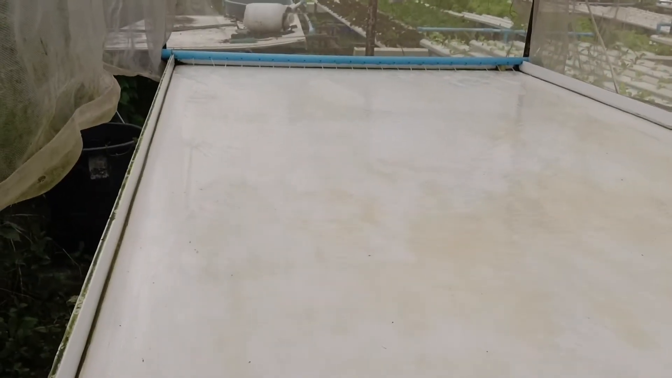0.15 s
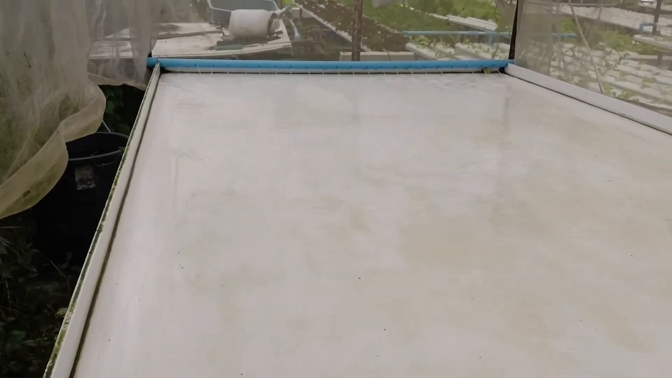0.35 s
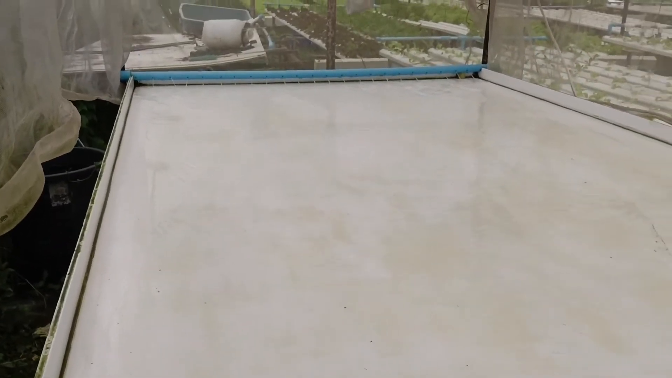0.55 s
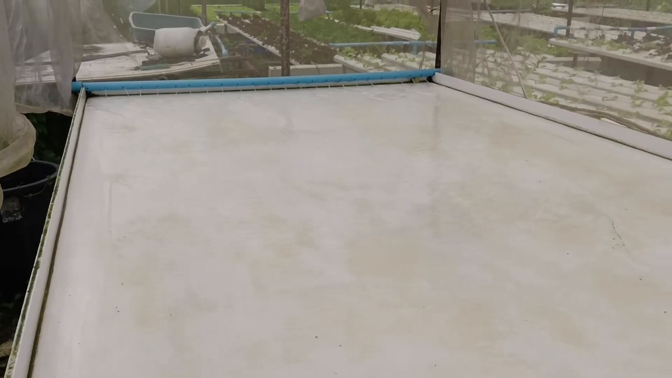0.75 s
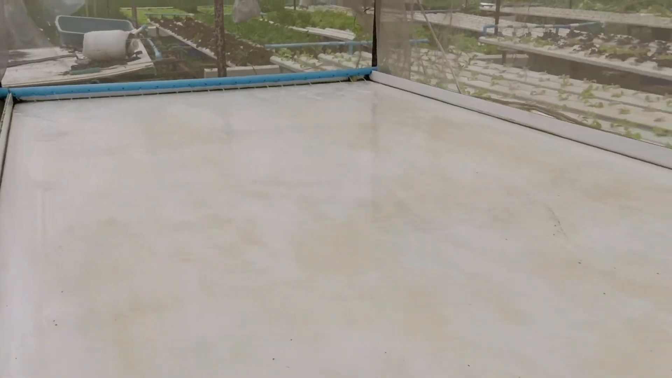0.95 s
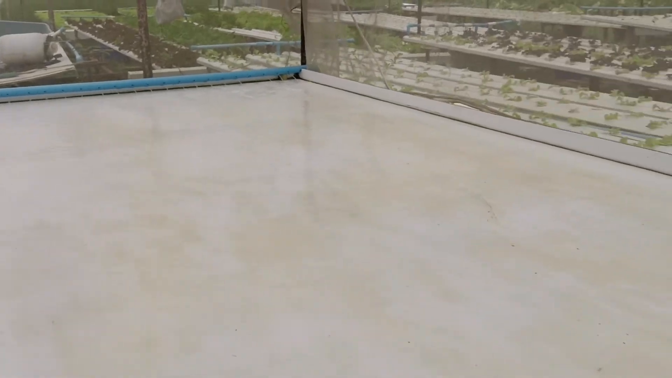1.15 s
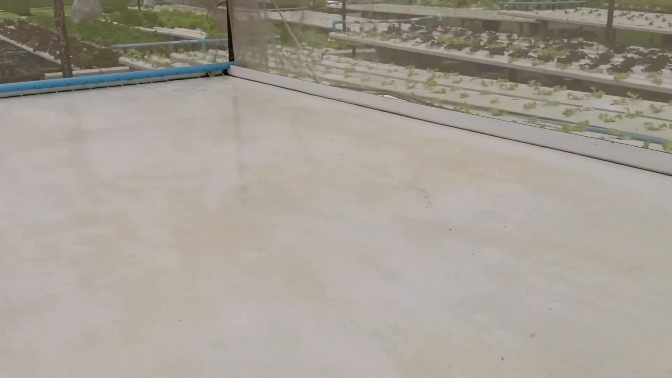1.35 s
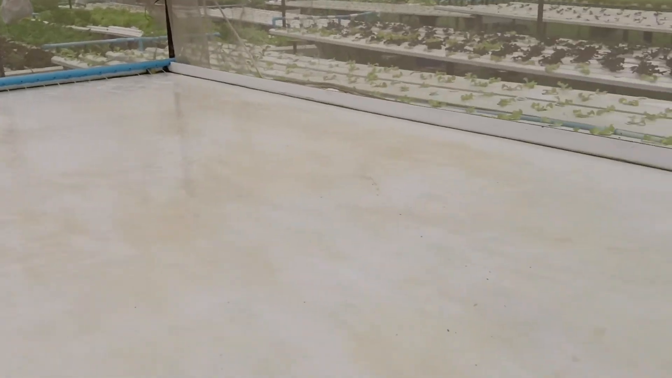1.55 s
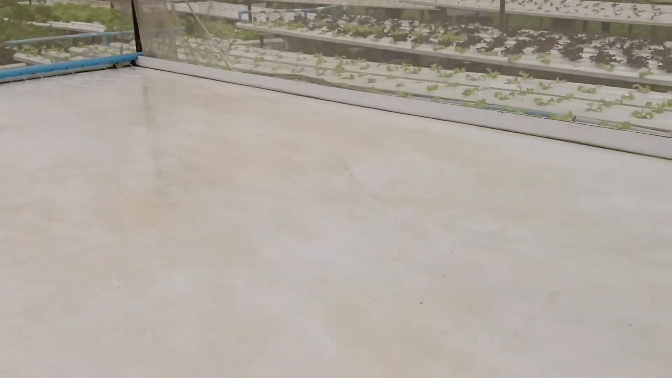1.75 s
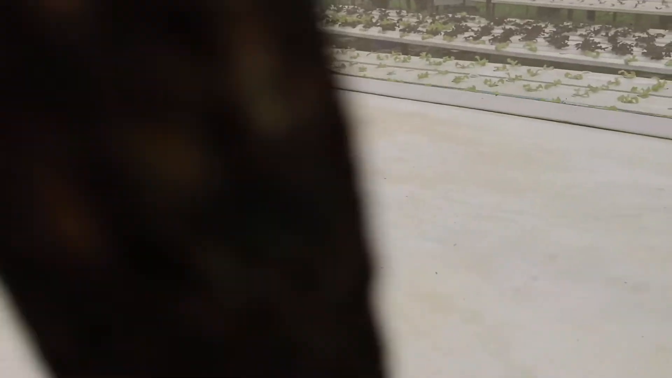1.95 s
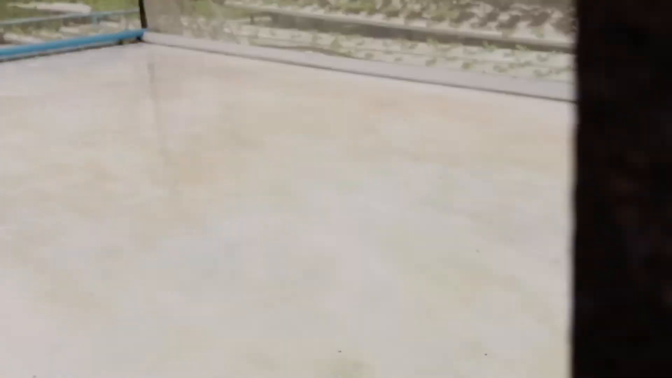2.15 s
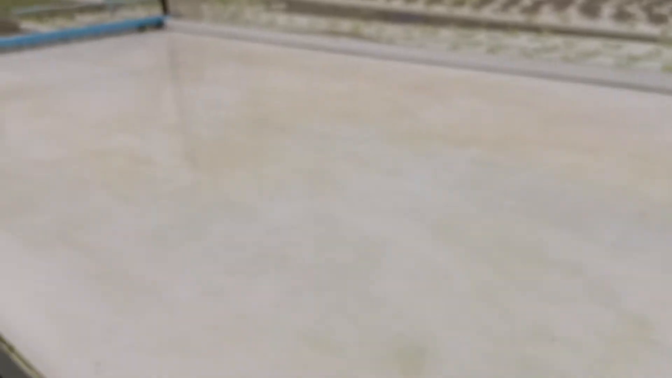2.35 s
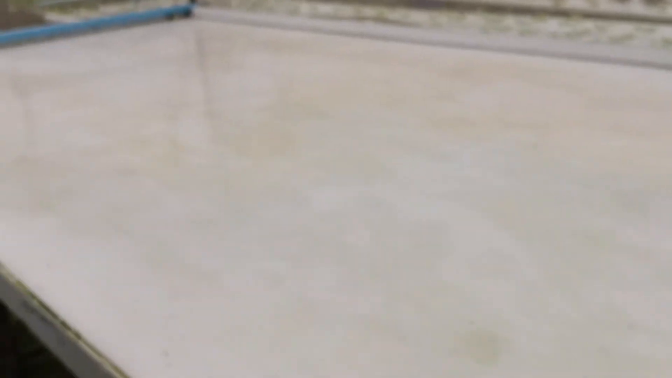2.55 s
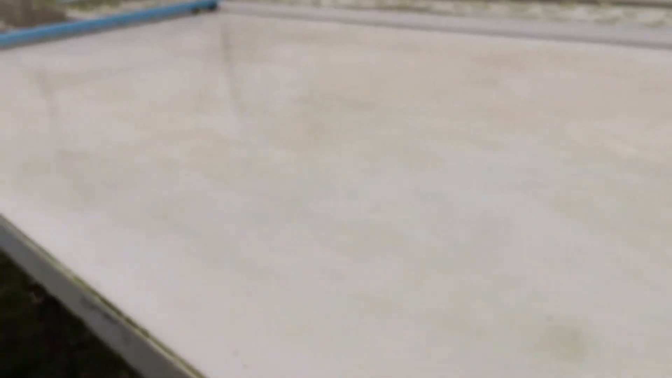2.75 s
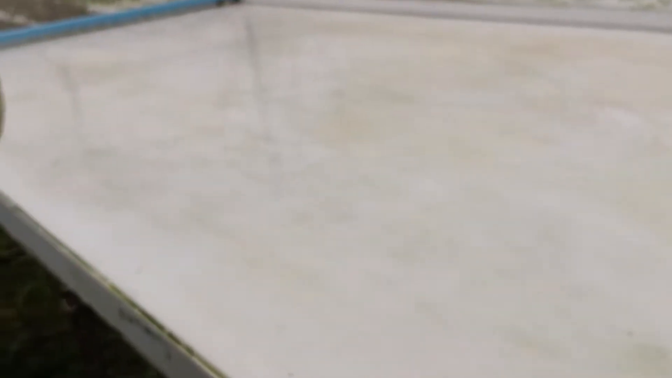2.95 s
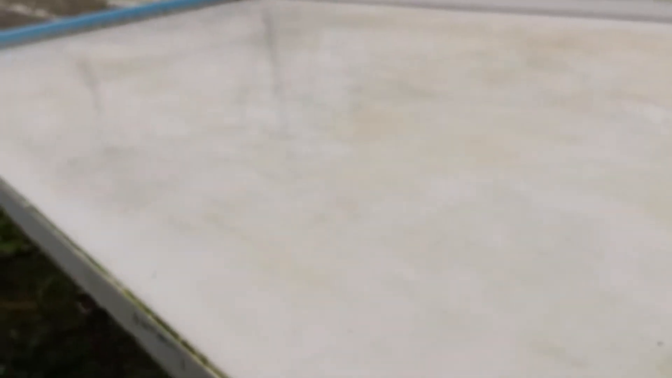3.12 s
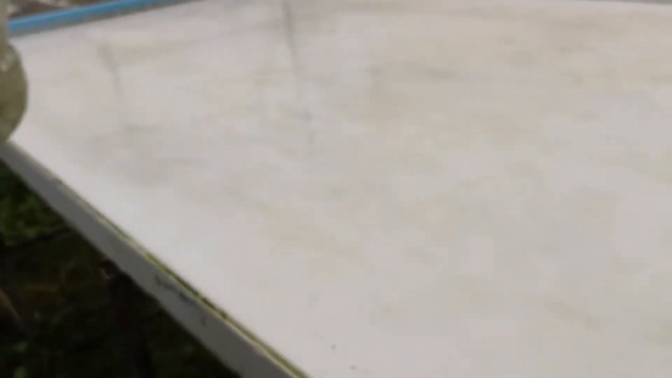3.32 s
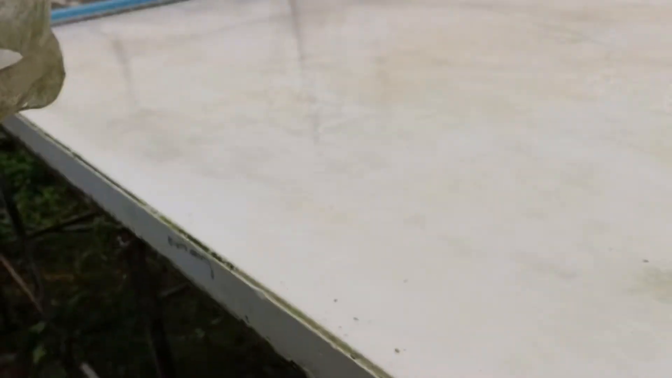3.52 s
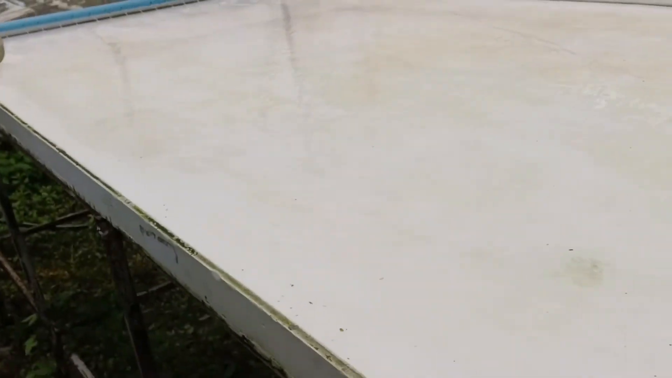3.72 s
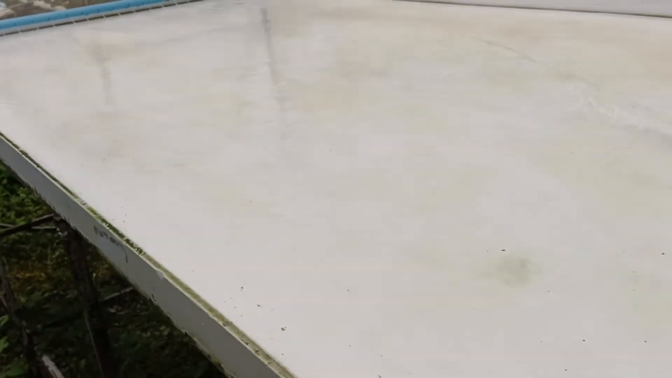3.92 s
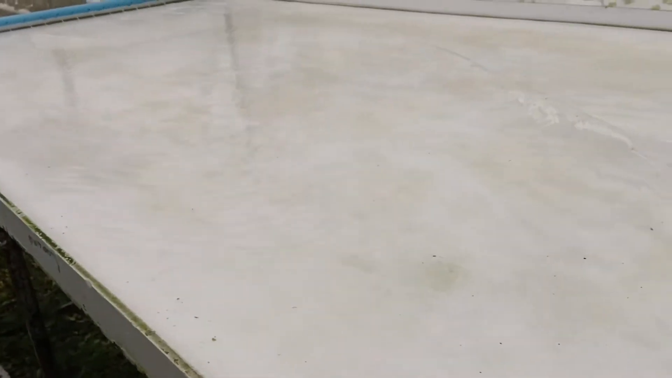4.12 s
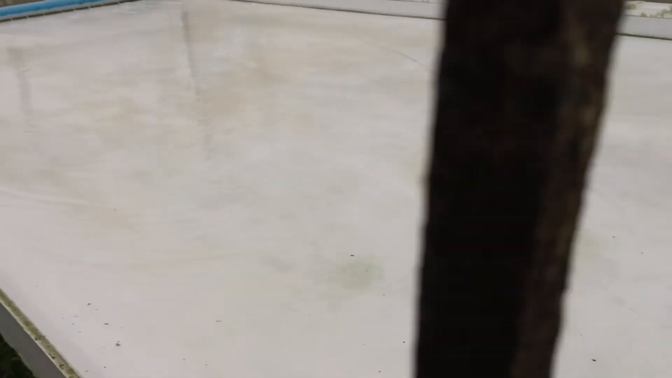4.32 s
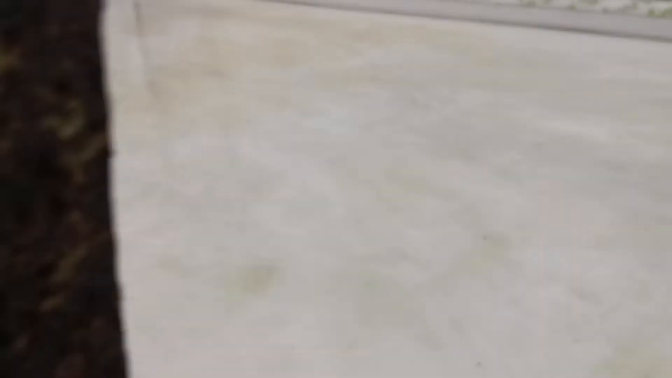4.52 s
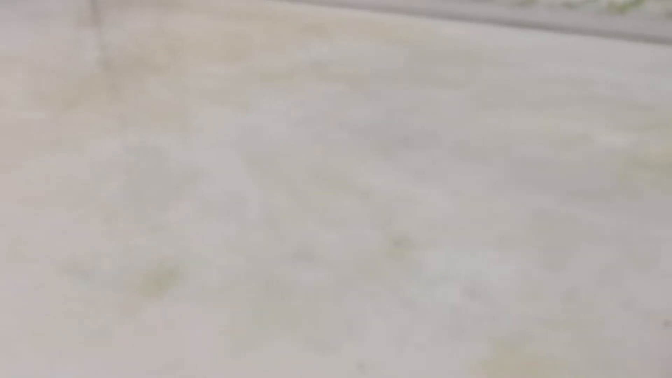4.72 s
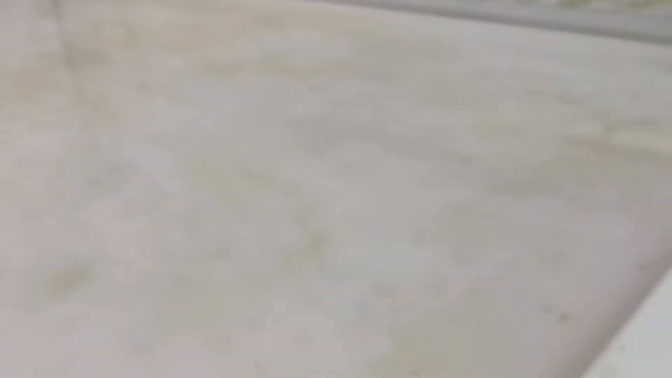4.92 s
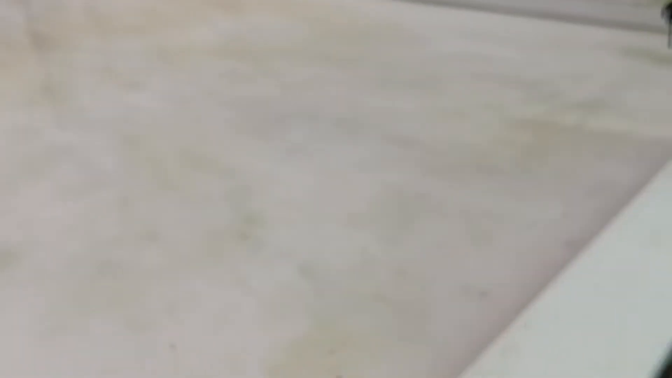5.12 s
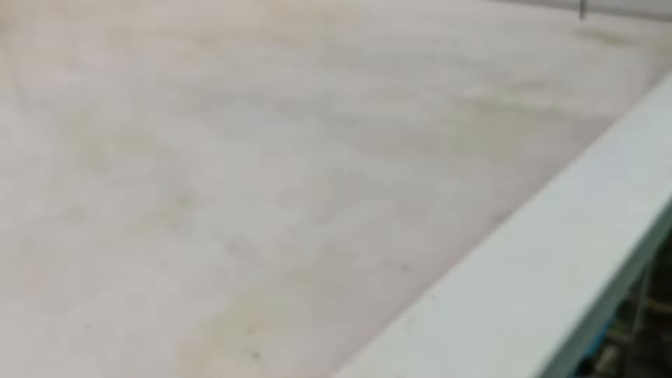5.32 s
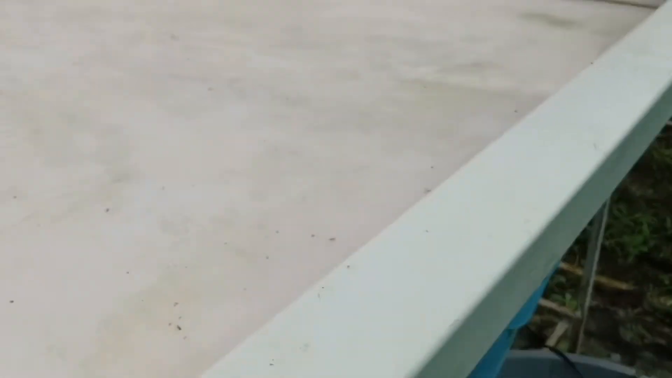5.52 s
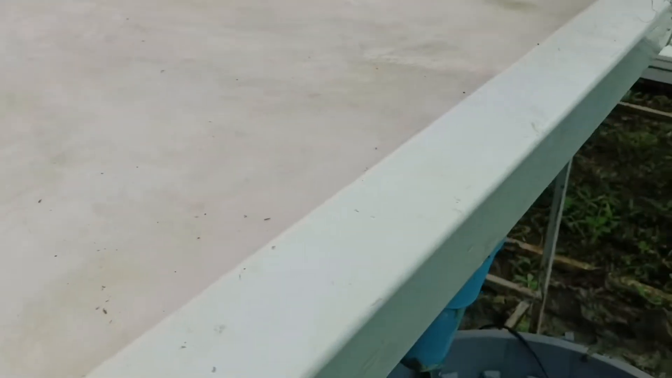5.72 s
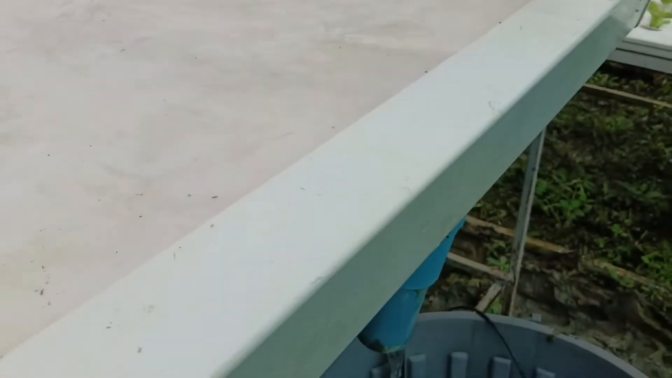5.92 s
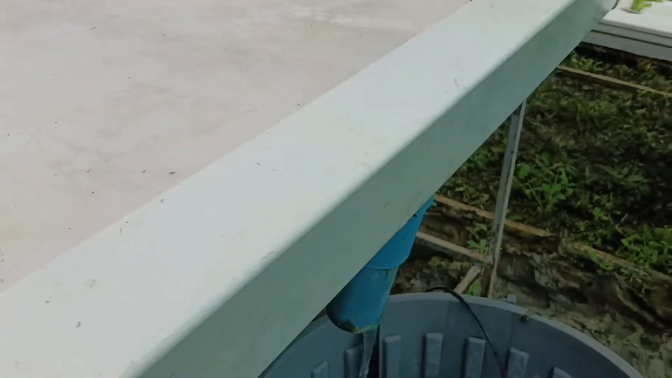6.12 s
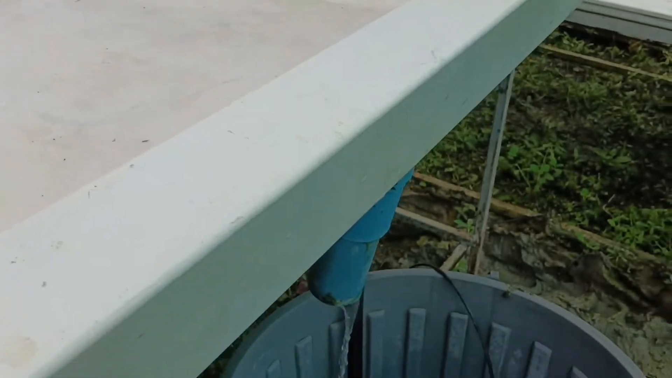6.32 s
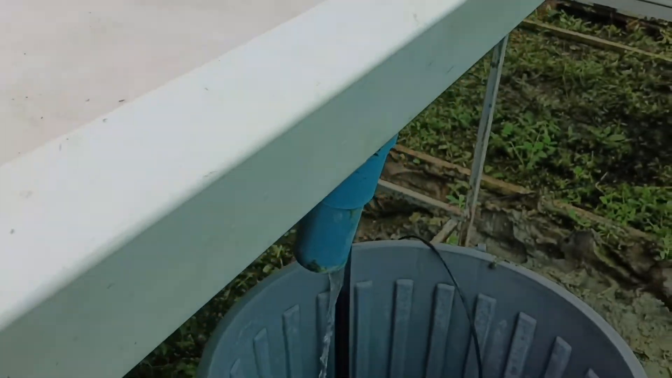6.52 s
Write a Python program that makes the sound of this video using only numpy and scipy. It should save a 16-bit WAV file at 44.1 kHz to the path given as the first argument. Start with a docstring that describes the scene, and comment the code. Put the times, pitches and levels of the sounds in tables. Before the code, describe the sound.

A continuous trickle falls from a drain pipe into a plastic tank in quiet open air. From 0 to 1.4 seconds it is distant, thin and leftward: high tinkling bubbles, soft hiss and occasional small plinks over a barely audible low pump hum. Around 2 seconds it swells with a cluster of brighter splashes and hollow plops, and another splashy group comes near 2.8. It eases back slightly around 3.3, where soft low bumps occur, the strongest at about 3.4. Sharp drops tick on plastic near 3.7 and 3.9. The hum fades from about 3.7 to 4.6 as the water grows closer. From 5.2 seconds splashes crowd together, bright and wet, with glugs, spray and a deeper uneven gurgle resonating in the tank. The stream stays close, fuller and more central until it cuts off at about 6.7 seconds, still running.

```python
"""Water patters and tinkles from the left: it runs off a shallow growing tray through a drain pipe into a plastic tank.
Decaying, rising sines model trapped bubbles; noise bursts model impacts; wall echoes and resonances model the tank.
The stream grows louder and more hollow, unevenly, as the microphone is carried round to the tank.
Filtered noise gives the air of a small farm, and a wavering sine a faint pump that fades in the second half.
Soft low bumps of decaying noise occur, the strongest near halfway."""
import sys
import numpy as np
from scipy import signal
from scipy.fft import rfft, irfft
from scipy.io import wavfile
from scipy.ndimage import uniform_filter1d, map_coordinates

SR = 44100
rng = np.random.default_rng(int(sys.argv[2]) if len(sys.argv) > 2 else 0)


def store_pcm(level_fs):
    """Save levels as 16-bit WAV."""
    pcm = np.round(np.clip(level_fs, -1, 1) * 32767).astype(np.int16)
    wavfile.write(sys.argv[1], SR, np.atleast_2d(pcm).T)


N = 293706
TIME = np.arange(N) / SR

# Walk round the tray. Columns: time_s, nearness (0 across the tray, 1 beside the tank)
WALK_PATH = [(1.4, 0), (1.9, 0.37), (2.3, 0.45), (2.8, 0.38), (3.3, 0.22), (4.1, 0.43), (4.9, 0.73),
             (5.6, 0.93), (6.66, 1)]
# The tank lies to the left, then almost ahead. Columns: time_s, right_delay_ms
TANK_BEARING = [(0, 0.089), (4.6, 0.24), (5.8, 0.018)]
# Relative colour of the water across the tray. Columns: frequency_hz, left_db, right_db
FAR_COLOUR = [(590, -22.5, -34), (1420, -7, -21), (1850, 0, -15), (1920, -1.5, -13), (3000, -1.5, -18),
              (3700, -11, -9), (4320, -14, -27), (4650, -15.5, -25), (5300, 1, -17), (6830, -4, -20),
              (8260, -20, -17), (8920, -19, -11.5), (9480, -13, -3.5), (11460, -25, -26),
              (11600, -45, -11.5), (14800, -46, -23.5)]
# Relative colour of the water beside the tank. Columns: frequency_hz, left_db, right_db
NEAR_COLOUR = [(576, -25, -13.5), (860, -17, -18.5), (1140, -69, -17), (1400, -5.5, 3.5),
               (2310, -6.5, -16.5), (2710, -1, -16.5), (3310, 2.5, -20), (4150, -6, -16), (4970, -5.5, -10),
               (7070, -8, -19), (8360, -20, -20.5), (10100, -15, -15), (12100, -19.5, -15),
               (15500, -25, -17.5)]
# Air resonances of the tank. Columns: frequency_hz, width_hz, gain_db
TANK_RESONANCES = [(187, 21, 10), (239, 23, 6.5), (293, 27, 7.5), (373, 15, 0), (596, 54, 4), (1051, 20, 2),
                   (1334, 66, 4.5)]
# Relative spectrum of outdoor air. Columns: frequency_hz, density_db
AIR_SPECTRUM = [(25, -38), (48, -14), (112, -4), (205, -10.5), (297, -8), (376, -13), (485, -22),
                (1030, -24), (1400, -62), (1820, -11), (3080, -120)]
# Small bubbles under the stream, before TINKLE_GAIN_DB. Columns: time_s, level_db, centre_pitch_hz
TINKLE_CURVE = [(0.0, -55.5, 2234), (0.91, -56.5, 2246), (1.41, -66, 2124), (1.56, -59.5, 2510),
                (1.91, -59.5, 2930), (2.2, -52, 2530), (3.02, -47.5, 3020), (3.3, -50.5, 3146),
                (3.76, -46, 2576), (4.13, -50, 2940), (5.62, -40.5, 3134), (6.34, -42, 2684),
                (6.66, -43.5, 3178)]
# Churns: the stream plunges deep and boils up. Columns: start_s, level_db, middle_pitch_hz, length_s
CHURN_EVENTS = [(0.0, -71, 272.6, 0.35), (2.8, -68.5, 730, 0.21), (4.9, -53, 385, 0.055),
                (5.032, -67.5, 278, 0.2), (5.398, -48.5, 830, 0.054), (5.529, -51, 247, 0.047),
                (5.583, -45.5, 375, 0.035), (5.791, -46.5, 380, 0.023), (6.098, -49, 734, 0.058),
                (6.2, -53.5, 480, 0.18), (6.384, -48, 623, 0.056)]
# Big splashes. Columns: start_s, level_db, bubble_pitch_hz, length_s
SPLASH_EVENTS = [(0.243, -43, 1970, 0.016), (0.26, -42, 1980, 0.018), (0.505, -53, 2700, 0.016),
                 (0.828, -41, 2424, 0.0094), (1.153, -44, 2567, 0.008), (1.65, -56, 2056, 0.019),
                 (1.991, -35, 2230, 0.017), (2.025, -38.5, 2180, 0.0085), (2.07, -42, 2200, 0.013),
                 (2.099, -42.5, 2190, 0.0097), (2.516, -47, 2630, 0.033), (2.747, -36.5, 2900, 0.014),
                 (2.834, -34.5, 2800, 0.014), (2.896, -40, 2920, 0.011), (2.937, -41, 2600, 0.0097),
                 (3.087, -45, 3040, 0.01), (3.635, -45.5, 3130, 0.02), (3.818, -44, 2386, 0.03),
                 (3.886, -33.5, 2450, 0.0039), (4.594, -39.5, 2390, 0.0088), (4.908, -41.5, 3130, 0.0079),
                 (4.979, -40.5, 2990, 0.0094), (5.184, -41, 3080, 0.011), (5.309, -29.5, 2910, 0.01),
                 (5.333, -31, 3000, 0.0081), (5.409, -33, 2930, 0.0068), (5.442, -35.5, 3330, 0.007),
                 (5.477, -32.5, 3290, 0.0084), (5.523, -34.5, 3300, 0.009), (5.581, -31, 3240, 0.0067),
                 (5.648, -38.5, 2820, 0.0095), (5.828, -37.5, 2860, 0.0066), (5.876, -42, 3100, 0.0081),
                 (5.903, -34, 3117, 0.0046), (5.935, -35.5, 3050, 0.013), (6.035, -35, 2600, 0.017),
                 (6.104, -34, 2980, 0.013), (6.469, -34.5, 2580, 0.0099), (6.481, -33.5, 3100, 0.013),
                 (6.625, -38, 3300, 0.011)]
# Glugs of large trapped air pockets. Columns: start_s, level_db, pitch_hz
GLUG_EVENTS = [(0.39, -59, 920), (1.447, -55.5, 1610), (1.75, -55, 598), (1.765, -54.5, 987),
               (1.993, -35.5, 1700), (2.024, -37, 1307), (2.045, -50, 1098), (4.552, -43, 1264),
               (4.61, -47.5, 1230), (4.697, -43.5, 1396), (4.907, -43, 1370), (5.333, -41.5, 1660),
               (5.399, -38, 1313), (5.461, -47.5, 774), (5.578, -39.5, 1240), (5.736, -38, 1680),
               (5.79, -43.5, 649), (6.05, -46.5, 695), (6.153, -36.5, 1690)]
# Showers of fine droplets. Columns: peak_s, gain_over_spray_db
FLURRY_EVENTS = [(0.833, 7), (1.786, 9), (1.821, 5.5), (2.236, 6.5), (2.914, 13), (3.562, 5), (4.24, 4),
                 (4.502, 7.5), (4.91, 7), (4.983, 5.5), (5.733, 7), (6.247, 6.5)]
# Gulps: bubble runs of sliding pitch. Columns: start_s, level_db, first_pitch_hz, last_pitch_hz, length_s
GULP_EVENTS = [(1.541, -70, 384, 420, 0.078), (1.781, -52.5, 2610, 3200, 0.061),
               (2.173, -57.5, 1300, 1060, 0.12), (2.302, -55.5, 1370, 1200, 0.11),
               (2.515, -55.5, 404, 418, 0.056), (2.618, -59, 506, 610, 0.042),
               (3.239, -54.5, 413, 500, 0.085), (3.405, -56.5, 538, 450, 0.074),
               (3.81, -59, 481, 392, 0.13), (3.944, -61.5, 1600, 1250, 0.16),
               (3.981, -56.5, 376, 464, 0.15), (4.154, -54, 1027, 1250, 0.1),
               (4.351, -61.5, 347, 419, 0.29), (4.812, -62, 605, 810, 0.13)]
# Soft low bumps. Columns: start_s, level_db, decay_s, upper_edge_hz
BUMP_EVENTS = [(1.572, -64.5, 0.038, 104), (3.154, -66, 0.3, 125), (3.285, -54.5, 0.11, 259),
               (3.355, -47, 0.02, 860), (3.373, -40.5, 0.004, 460)]
# Drops that snap on hard plastic. Columns: start_s, level_db
SNAP_EVENTS = [(3.047, -47), (3.707, -38.5), (3.887, -39.5), (5.523, -38)]

TANK_T60_S = 0.11
TANK_NULL_HZ, TANK_NULL_WIDTH_HZ = 948, 220   # here the air in the tank cancels itself
CUTOFF_HZ = 15800
COLOUR_POWER, MOUTH_POWER = 0.67, 1.74   # the colour turns early in the walk, the depths open late
RIGHT_GAIN_DB = -1.5
AIR_DB, PUMP_DB, PUMP_HZ = -71, -75.5, 120
TINKLE_GAIN_DB = 0.5
# far and near levels of the other voices of the stream
SPRAY_FAR_DB, SPRAY_NEAR_DB = -56.5, -45
PLOP_FAR_DB, PLOP_NEAR_DB = -76.5, -52
GURGLE_FAR_DB, GURGLE_NEAR_DB = -100, -59.5
GURGLE_RIM_HZ, GURGLE_DEEP_HZ = 439, 336   # heard past the rim, and looking down into the tank
GURGLE_WANDER_OCT = 0.12   # the air pockets under the stream grow and shrink
CHURN_BUBBLES_PER_S, GULP_BUBBLES_PER_S = 600, 130
CRACK_FAR_DB, CRACK_NEAR_DB = -2.5, 0.5   # the crack is weaker against the bubble ring from afar
SPLASH_SWELL_SHARE = 0.078   # swell time constant as a share of the splash length
# rates at full nearness; the OVER levels are relative to the tinkle, the plops and the spray
SMALL_SPLASHES_PER_S, SMALL_SPLASH_OVER_DB, SMALL_SPLASH_S = 7, -2.5, 0.013
SMALL_GLUGS_PER_S, SMALL_GLUG_OVER_DB, SMALL_GLUG_LOW_HZ, SMALL_GLUG_HIGH_HZ = 7, -1.5, 692, 1980
FAINT_SNAPS_PER_S, FAINT_SNAP_OVER_DB = 6, -0.5
GLUG_CYCLES = 11   # a pocket breaks up over this many of its own cycles, so deep glugs last longer
FLURRY_S = 0.01   # from the peak of a shower to 1/e
FLURRY_LOW_HZ, FLURRY_HIGH_HZ = 4120, 7060


def from_db(db):
    """Decibel law: convert level to amplitude ratio."""
    return 10 ** (np.asarray(db) / 20)


def between(start, end, share):
    """Linear interpolation: go part of the way from one value to another."""
    return start + (end - start) * share


def unit(x):
    """Normalization: scale so that the centre of a stereo pair has rms 1."""
    return x / np.sqrt(np.mean(np.atleast_2d(x).mean(0) ** 2) + 1e-20)


def evened(x):
    """Level compensation: hold the slow rms at 1, leaving the grain."""
    return x / np.sqrt(uniform_filter1d(x.mean(0) ** 2, SR // 3) + 1e-12)


def at_level(sound, db, length):
    """Energy average: set the centre rms over the given length and a short ring."""
    head = sound[:, :int((length + .01) * SR)].mean(0)
    return sound * from_db(db) / np.sqrt(np.mean(head ** 2))


def in_time(rows):
    """Linear interpolation: sample each column of a curve over time."""
    s, *columns = np.transpose(rows)
    return [np.interp(TIME, s, c) for c in columns]


def drift(rate):
    """Random modulation: join normal deviates, rate per second, into a curve of rms 1."""
    knots = rng.standard_normal(1024)
    return unit(np.interp(TIME * rate, np.arange(len(knots)), knots))


def chance(per_s):
    """Independent random events: sample numbers drawn at a changing rate."""
    return np.flatnonzero(rng.random(N) < per_s / SR)


def add(out, s, sound):
    """Superposition: mix a sound in at time s."""
    at = min(max(int(s * SR), 0), N - 1)
    out[..., at:at + sound.shape[-1]] += sound[..., :N - at]


def band(x, low_hz, high_hz, order=2):
    """Band limitation by a Butterworth filter."""
    edges = [low_hz, min(high_hz, SR / 2 - 1)]
    return signal.sosfilt(signal.butter(order, edges, "band", fs=SR, output="sos"), x)


def colour(x, spectrum, size=2048):
    """Minimum-phase filtering: a folded cepstrum gives one causal response for each dB column."""
    hz, *sides = np.transpose(spectrum)
    grid = np.log(np.maximum(np.fft.rfftfreq(size, 1 / SR), 1))
    gains = from_db([np.interp(grid, np.log(hz), db) for db in sides])
    cepstrum = irfft(np.log(gains))
    cepstrum[:, 1:] *= 2
    response = irfft(np.exp(rfft(cepstrum[:, :size // 2], size)))
    return signal.fftconvolve(x, response, axes=1)[:, :x.shape[-1]]


def heard(x, nearness, low_hz, high_hz):
    """Position-dependent timbre: one register of the water crossfades from far to near colour."""
    x = band(x, low_hz, high_hz, order=4)
    return unit(colour(x, FAR_COLOUR)) * (1 - nearness) + unit(colour(x, NEAR_COLOUR)) * nearness


def tank(x, wet_db, t60=TANK_T60_S):
    """Reverberation: direct sound, then quick decaying wall reflections, different on each side."""
    t = TIME[:SR // 6]
    walls = rng.standard_normal((2, len(t))) * from_db(-60 * t / t60) * (t > .0012)
    response = from_db(wet_db) * walls / np.linalg.norm(walls, axis=1, keepdims=True)
    response[:, 0] += 1   # direct sound
    return signal.fftconvolve(x, response, axes=1)[:, :x.shape[-1]]


def hollow(x):
    """Cavity resonance: the air in the tank rings at its own pitches, with a hole between them."""
    rings = sum(from_db(db) * signal.lfilter(*signal.iirpeak(hz, hz / width, fs=SR), x)
                for hz, width, db in TANK_RESONANCES)
    notch = signal.iirnotch(TANK_NULL_HZ, TANK_NULL_HZ / TANK_NULL_WIDTH_HZ, fs=SR)
    return signal.lfilter(*notch, x + rings)


def bubble(hz, cycles, rise, side, swell_cycles=0.25):
    """Damped oscillation: an air bubble swells and rings with rising pitch; its place sets the stereo phase."""
    turns = np.arange(int(cycles * SR / hz) + 2) * hz / SR
    age = turns / cycles
    lead = np.array([[0], [side * min(hz / 750, np.pi)]])
    envelope = from_db(-50 * age) * (1 - np.exp(-turns / swell_cycles))
    return np.sin(2 * np.pi * turns * (1 + rise * age / 2) + lead) * envelope


def bubbling(per_s, pitch_hz, octaves, cycles, spread_db, rise):
    """Random superposition: bubbles of scattered pitch, size and place are born by chance."""
    out, pitch, width = np.zeros((2, N)), np.broadcast_to(pitch_hz, N), np.broadcast_to(octaves, N)
    born = chance(per_s)
    for at, (place, bulk, side, sign) in zip(born, rng.uniform(-1.012, 1, (len(born), 4))):
        hz = min(pitch[at] * 2 ** (width[at] * place / 2), CUTOFF_HZ)
        gain = np.sign(sign) * from_db(spread_db * bulk ** 2)
        add(out, at / SR, gain * bubble(hz, cycles, rise, side))
    return out


def burst(hz, length, octaves, cycles, rise, later_db, count, swell_cycles):
    """Air entrainment: a lump of water traps one leading bubble and others after it."""
    out = np.zeros((2, N))
    for k, (when, place, side, sign) in enumerate(rng.uniform(-1, 1, (count, 4))):
        delay = abs(when) * (k > 0)   # share of the burst length
        pitch = hz * 2 ** (octaves * place * (k > 0))
        gain = np.sign(sign) * from_db(later_db * delay)
        add(out, delay * length, gain * bubble(pitch, cycles, rise, side, swell_cycles))
    return out[:, :SR // 4]


def tinkling(tone, lumps):
    """Small-bubble resonance: high rings whose pitch wanders as the stream sways."""
    level_db, pitch_hz = in_time(TINKLE_CURVE)
    wander = 2 ** (0.1203 * drift(7))
    bubbles = bubbling(per_s=480, pitch_hz=pitch_hz * wander, octaves=0.35 + 0.792 * tone,
                       cycles=47, spread_db=11.0, rise=0.05)
    bubbles *= from_db(2.0 * lumps + 2.4 * drift(17))
    sound = heard(tank(bubbles, wet_db=4.0), tone, 1180, 3600)
    return evened(sound) * from_db(level_db + TINKLE_GAIN_DB)


def spray(tone, lumps):
    """Impact superposition: droplets tick with brief rings; from afar they merge into a hiss."""
    drops = bubbling(per_s=800, pitch_hz=8300, octaves=1.664, cycles=28.0, spread_db=23.5, rise=0.031)
    hiss = unit(rng.standard_normal((2, N))) * from_db(8.0 - 7.8 * tone)
    flicker_db = between(3.0, 1.53, tone) * lumps + 0.62 * drift(14)
    return tank((unit(drops) + hiss) * from_db(flicker_db), wet_db=-0.5, t60=0.031)


def plopping(lumps):
    """Bubble and cavity resonance: middle-sized bubbles ring in the hollow tank."""
    plops = bubbling(per_s=200, pitch_hz=1262, octaves=1.354, cycles=57, spread_db=17, rise=0.022)
    return band(hollow(tank(plops * from_db(2.0 * lumps), wet_db=-3.0)), 964, 2560, order=2)


def gurgling(nearness):
    """Large-bubble resonance: low rings surge unevenly as the stream gulps air into the tank."""
    mouth = nearness ** MOUTH_POWER   # the depths open late
    wander = 2 ** (GURGLE_WANDER_OCT * drift(7.8))
    pitch_hz = between(GURGLE_RIM_HZ, GURGLE_DEEP_HZ, mouth) * wander
    gurgle = bubbling(per_s=260, pitch_hz=pitch_hz, octaves=0.067 + 1.26 * mouth,
                      cycles=14.7, spread_db=12.5, rise=0.24)
    upper = bubbling(per_s=170, pitch_hz=640, octaves=0.88, cycles=30.0, spread_db=10.0, rise=0.21)
    gurgle += from_db(1.0) * nearness * upper
    gurgle *= from_db(2 * drift(16))   # uneven surges
    return band(hollow(tank(gurgle, wet_db=-2.5)), 160, 1200, order=3) * from_db([[1], [-1]])


def stream(nearness, tone):
    """Superposition by register: spray on top, bubbles in the middle, a hollow gurgle below."""
    lumps = drift(55) * tone   # the stream breaks into lumps, plainer from close by
    tinkle = tinkling(tone, lumps)
    mist = heard(spray(tone, lumps), tone, 4200, 23000)
    layers = [(mist, between(SPRAY_FAR_DB, SPRAY_NEAR_DB, nearness)),
              (plopping(lumps), between(PLOP_FAR_DB, PLOP_NEAR_DB, nearness)),
              (gurgling(nearness), between(GURGLE_FAR_DB, GURGLE_NEAR_DB, tone))]
    return tinkle + sum(evened(sound) * from_db(db) for sound, db in layers)


def churns():
    """Collective excitation: a crowd of overlapping bubbles sets the whole tank ringing."""
    out = np.zeros((2, N))
    for s, db, hz, length in CHURN_EVENTS:
        crowd = burst(hz, length, octaves=0.86, cycles=9.8, rise=0.14, later_db=-0.5,
                      count=int(length * CHURN_BUBBLES_PER_S), swell_cycles=0.73)
        add(out, s, at_level(hollow(crowd), db, length))
    return out


def farm():
    """Broadband and tonal ambience: soft outdoor rumble and a wavering pump hum that fades."""
    noise = rng.standard_normal(N) + from_db(-5.5) * rng.standard_normal((2, N))   # common and side parts
    air = unit(colour(noise, AIR_SPECTRUM, size=8192)) * from_db(1.8 * drift(8.5))
    hum = np.sqrt(2) * np.sin(2 * np.pi * PUMP_HZ * TIME + 1.2 * drift(4.12)) * from_db(2.6 * drift(4.3))
    hum_db = np.interp(TIME, [3.7, 4.6], [PUMP_DB, PUMP_DB - 14])
    return from_db(AIR_DB) * air + from_db(hum_db) * hum


def splashes(rows, nearness):
    """Impact and resonance: a crack of surface spray joins a cluster of small bubbles."""
    out = np.zeros((2, N))
    for s, db, hz, length in rows:
        rings = unit(burst(hz, length, octaves=0.32, cycles=43, rise=0.07, later_db=-10,
                           count=8, swell_cycles=0.93))
        t = TIME[:rings.shape[1]]
        near = np.interp(s, TIME, nearness)
        crack = unit(rng.standard_normal(rings.shape) * np.exp(-t / (1.46 * length)))
        edge_hz = min(12000 * (0.045 / length) ** 0.33, 18000)   # brief impacts are the brightest
        crack = band(crack, 880, max(edge_hz, 3500), order=1)
        crack *= from_db(between(CRACK_FAR_DB, CRACK_NEAR_DB, near ** 2))
        crack *= np.sqrt(0.0062 / length)   # brief impacts crack harder
        swell = 1 - np.exp(-t / (SPLASH_SWELL_SHARE * length))
        sound = tank((rings + crack) * swell, wet_db=-6.5, t60=0.15)
        sound = colour(sound, FAR_COLOUR) * (1 - near) + colour(sound, NEAR_COLOUR) * near
        add(out, s, at_level(sound, db, length))
    return out


def small_splashes(nearness):
    """Random impacts: splash rows near the tinkle's pitch, more frequent as the tank comes closer."""
    db, hz = in_time(TINKLE_CURVE)
    born = chance(SMALL_SPLASHES_PER_S * nearness ** 2)
    return [(at / SR, db[at] + SMALL_SPLASH_OVER_DB + 2.4 * bulk, hz[at] * 2 ** (.2 * pitch),
             SMALL_SPLASH_S * 2 ** span)
            for at, (bulk, pitch, span) in zip(born, rng.uniform(-0.71, 1, (len(born), 3)))]


def glugs(rows):
    """Large-bubble resonance: air pockets swell and ring with a rising note, and the tank holds it."""
    out = np.zeros((2, N))
    for s, db, hz in rows:
        length = GLUG_CYCLES / hz
        rings = burst(hz, length, octaves=0.22, cycles=17.4, rise=0.13, later_db=-8.5,
                      count=4, swell_cycles=0.55)
        sound = band(hollow(tank(rings, wet_db=-4.0)), hz * 0.84, hz * 2.0)
        add(out, s, at_level(sound, db, length))
    return out * from_db([[.8], [-.8]])


def small_glugs(nearness):
    """Random air entrainment: glug rows at scattered pitches, more frequent near the tank."""
    db = between(PLOP_FAR_DB, PLOP_NEAR_DB, nearness) + SMALL_GLUG_OVER_DB
    born = chance(SMALL_GLUGS_PER_S * nearness)
    return [(at / SR, db[at], SMALL_GLUG_LOW_HZ * (SMALL_GLUG_HIGH_HZ / SMALL_GLUG_LOW_HZ) ** place)
            for at, place in zip(born, rng.random(len(born)))]


def flurries(nearness):
    """Gated random superposition: the stream throws up brief showers of ringing droplets."""
    drops = bubbling(per_s=1900, pitch_hz=5420, octaves=0.97, cycles=8, spread_db=22, rise=0.061)
    drops = band(tank(drops, wet_db=-8), FLURRY_LOW_HZ, FLURRY_HIGH_HZ)
    drops = unit(drops * from_db([[4], [-4]]))
    showers = sum(from_db(db) * np.exp(-((TIME - s) / FLURRY_S) ** 2) for s, db in FLURRY_EVENTS)
    return drops * showers * from_db(between(SPRAY_FAR_DB, SPRAY_NEAR_DB, nearness))


def gulps():
    """Size-dependent resonance: air drawn under makes a string of bubbles that shrink or grow."""
    out = np.zeros((2, N))
    for s, db, first_hz, last_hz, length in GULP_EVENTS:
        run, count = np.zeros((2, SR // 2)), max(int(length * GULP_BUBBLES_PER_S), 2)
        for k, (late, place, side, bulk) in enumerate(rng.uniform(-1.1, 1, (count, 4))):
            along = (k + abs(late)) / count
            hz = between(first_hz, last_hz, along) * 2 ** (0.19 * place)
            ring = bubble(hz, cycles=33.4, rise=0.046, side=side, swell_cycles=1.15)
            add(run, along * length, from_db(6 * bulk) * ring)
        add(out, s, at_level(tank(run, wet_db=-8.5), db, length))
    return out


def bumps():
    """Damped low-frequency impulse: band-limited noise decays as a dull thud."""
    out, t = np.zeros((2, N)), TIME[:SR // 3]
    for s, db, length, edge_hz in BUMP_EVENTS:
        push = rng.standard_normal(len(t)) * np.exp(-t / length)
        thud = band(band(push, 53, edge_hz, order=1), 35, 3 * edge_hz)
        add(out, s, at_level(thud * from_db([[3], [-4]]), db, length))
    return out


def snaps(rows):
    """Hard impact: a drop on plastic gives one bright noise tick with a brief reverberant ring."""
    out, t = np.zeros((2, N)), TIME[:SR // 10]
    for s, db in rows:
        tick = rng.standard_normal((2, len(t))) * np.exp(-t / 0.0047)
        tick = band(tick, 7200, 15600, order=1)
        sound = colour(tank(tick, wet_db=-7.0, t60=0.19), NEAR_COLOUR)
        add(out, s, at_level(sound, db, length=0.0014))
    return out


def faint_snaps(nearness):
    """Random hard impacts: snap rows for stray drops on the tank wall, more frequent close by."""
    db = between(SPRAY_FAR_DB, SPRAY_NEAR_DB, nearness) + FAINT_SNAP_OVER_DB
    return [(at / SR, db[at]) for at in chance(FAINT_SNAPS_PER_S * nearness ** 2)]


def scene():
    """Interaural time difference: the walk turns the water in the stereo image over the quiet farm."""
    nearness = np.clip(in_time(WALK_PATH)[0], 0, 1)
    tone = nearness ** COLOUR_POWER   # share of the near colour
    water = stream(nearness, tone) + churns()
    water += splashes(list(SPLASH_EVENTS) + small_splashes(nearness), tone)
    water += glugs(list(GLUG_EVENTS) + small_glugs(nearness))
    water += flurries(nearness) + gulps()
    water += snaps(list(SNAP_EVENTS) + faint_snaps(nearness))
    left, right = water
    delay_ms, = in_time(TANK_BEARING)
    right = map_coordinates(right, [np.arange(N) - delay_ms * SR / 1000], order=3)
    return np.array([left, right * from_db(RIGHT_GAIN_DB)]) + bumps() + farm()


def record(dry):
    """Band limitation: a steep elliptic low-pass cuts the top."""
    return signal.sosfilt(signal.ellip(10, .1, 80, CUTOFF_HZ, fs=SR, output="sos"), dry)


dry = scene()
out = record(dry)
store_pcm(out)
```